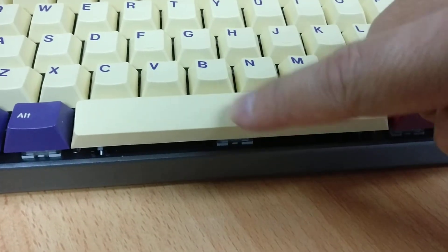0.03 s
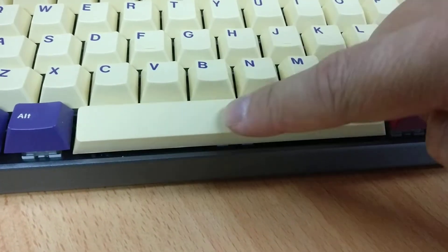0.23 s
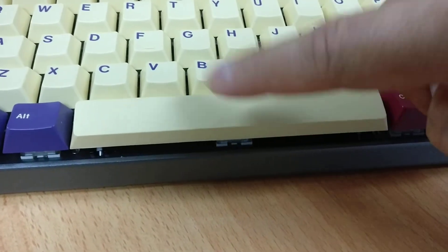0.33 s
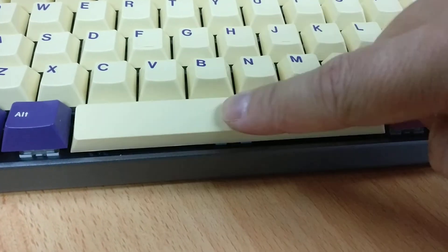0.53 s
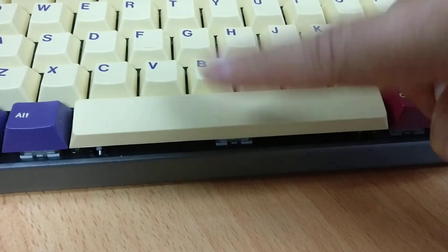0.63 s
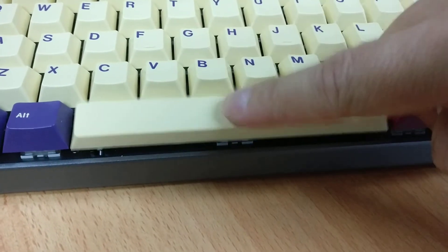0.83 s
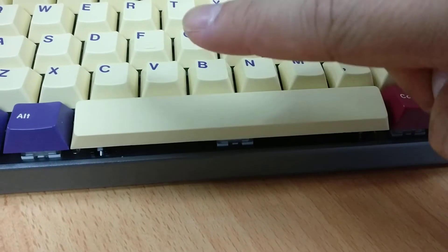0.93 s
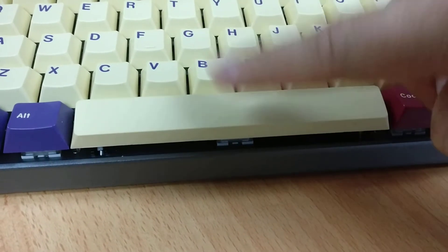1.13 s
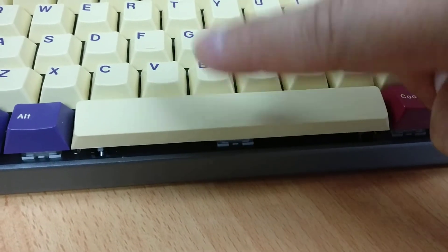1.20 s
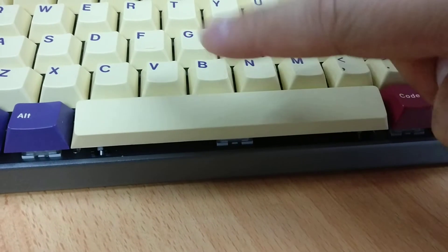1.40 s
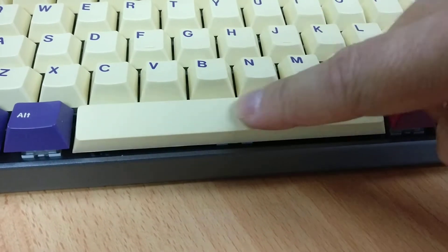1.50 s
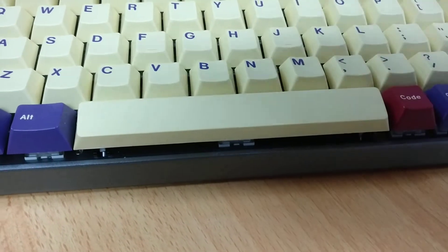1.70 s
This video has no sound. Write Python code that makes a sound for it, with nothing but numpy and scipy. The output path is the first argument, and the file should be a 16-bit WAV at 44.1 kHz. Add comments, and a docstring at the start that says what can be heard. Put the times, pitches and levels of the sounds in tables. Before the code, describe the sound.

Six quick spacebar presses on a mechanical keyboard, each clicking down and clacking back up.

```python
"""At a wooden desk in a small room, a finger presses and releases a loose plastic spacebar six times.
Each stroke starts with ticks of the slack wire that steadies the bar. Then the switch snaps and the bar
hits its stop: bright on the way down, hollower on the way up. The case thuds on the desk, the squeezed
spring buzzes and the fingertip rubs the plastic. The room echoes briefly over a low rumble and hum."""
import sys
import numpy as np
from scipy import signal
from scipy.fft import rfft, irfft
from scipy.io import wavfile

SR = 44100
rng = np.random.default_rng(int(sys.argv[2]) if len(sys.argv) > 2 else 0)


def inscribe(sig):
    """Save sig as 16-bit PCM at rate SR to the path in sys.argv[1].

    A 1-D sig is mono; a 2-D sig holds one channel per row.
    Samples are clipped to [-1, 1] before scaling.
    """
    pcm = np.round(np.clip(np.atleast_2d(sig).T, -1, 1) * 32767)
    wavfile.write(sys.argv[1], SR, pcm.astype(np.int16))


N = 77175
T = np.arange(N) / SR
HIT_T = T[:SR // 8]  # the time span of one hit, in seconds

# Levels are relative. fade_s is the time to fall by 60 dB; pan_db is how much louder the left side is.
# the tone of the switch's noisy snap: pitch_hz, level_db
SNAP_COLOUR = [(6000, -26.5), (8800, -19), (10000, -8), (13000, -8.5), (14500, -12), (15600, 1),
               (16500, -36)]
SNAP_DB, SNAP_FADE_S, SNAP_PAN_DB = -10.5, 0.016, 14


def from_db(db):
    """Turn decibels into a number to multiply by."""
    return 10 ** (np.asarray(db) / 20)


def at_hz(points, n):
    """Read a table at every frequency of a sound n samples long."""
    hz, value = np.transpose(points)
    return np.interp(np.log(np.arange(n // 2 + 1) * SR / n + 1), np.log(hz), value)


def pan(db):
    """Left and right gains; the left keeps its level."""
    return np.array([[1], [from_db(-db)]])


def add(out, start_s, sound):
    """Mix a sound in at its start time."""
    i = int(start_s * SR)
    out[:, i:i + sound.shape[1]] += sound[:, :N - i]


def noise(colour, n, likeness=0):
    """Stereo noise of strength 1, shaped by a tone table; likeness 1 makes both sides the same."""
    mid, side = np.exp(2j * np.pi * rng.random((2, n // 2 + 1)))
    both = np.sqrt(1 + likeness) * mid + np.sqrt(1 - likeness) * side * [[1], [-1]]
    x = irfft(both * from_db(at_hz(colour, n)), n)
    return x / x.std()


def flutter(n, depth_db, rate_hz):
    """A level that wavers quickly at random, making a sound rough."""
    return from_db(depth_db * np.interp(T[:n] * rate_hz, np.arange(n), rng.standard_normal(n)))


def ring(tones, damping=1):
    """A struck part rings with its own tones, a little different each time; damping shortens them."""
    out = 0
    for k, (pitch_hz, fade_s, level_db, pan_db) in enumerate(tones):
        stray_db, detune = rng.standard_normal(2)
        wave = np.sin(2 * np.pi * pitch_hz * (1 + 0.003 * detune) * HIT_T)
        fade = from_db(level_db + stray_db - 60 * damping * HIT_T / fade_s)
        out = out + (-1) ** k * pan(pan_db) * wave * fade  # every other tone starts flipped
    return out


def burst(colour, level_db, fade_s, pan_db, rise_s=0.00045):
    """Many close tones blur into noise and die away together."""
    shape = (1 - np.exp(-HIT_T / rise_s)) * from_db(level_db - 60 * HIT_T / fade_s)
    return pan(pan_db) * shape * noise(colour, len(HIT_T))


def background():
    """Low room rumble with a little hiss and an electric hum."""
    # the tone of the rumble and hiss: pitch_hz, level_db
    air_colour = [(22, -40), (30, -16), (38, 7), (48, -3.5), (80, 1), (130, -0.5), (220, -6), (310, -14),
                  (430, -22), (700, -16.5), (1070, -24), (2100, -22), (3700, -28), (7700, -40.5),
                  (13200, -36.5), (16000, -41.5)]
    # how alike left and right are: pitch_hz, likeness (0 to 1)
    likeness = [(60, 0.97), (150, .97), (350, 0.9), (700, 0.42), (2000, 0.067), (10000, .05)]
    # the tones of the hum: pitch_hz, level_db
    hum_tones = [(61, -52), (114, -54.5)]
    air = from_db(-44.5) * noise(air_colour, N, at_hz(likeness, N))
    hum = sum(from_db(db) * np.sin(2 * np.pi * (hz * T + rng.random())) for hz, db in hum_tones)
    return air + np.sqrt(2) * hum


def room(sound, build_s=0.012, room_fade_s=0.22, desk_fade_s=0.078):
    """Sound bounces quickly off the desk and case, then dies away in the small room."""
    # the tone of the echo: pitch_hz, level_db
    echo_colour = [(150, -25), (700, -12), (1700, -20.5), (2800, -14), (4200, -14), (7000, -17),
                   (10500, -27), (15000, -30.5)]
    fade = from_db(-60 * T / room_fade_s) + from_db(-9 - 60 * T / desk_fade_s)
    shape = (1 - np.exp(-T / build_s)) * fade
    bounces = irfft(rfft(rng.standard_normal((2, N))) * from_db(at_hz(echo_colour, N)), N)
    echo = bounces * shape / np.sqrt(np.sum(shape ** 2))
    return pan(1.5) * signal.fftconvolve(sound[:1], echo, axes=1)[:, :N]


def finger():
    """Skin sticks and slips on the plastic in soft swells."""
    # each slide of the fingertip: middle_s, half_length_s, level_db
    rubs = [(0.166, 0.11, -60), (0.467, 0.017, -55.5), (0.733, 0.059, -59.5), (0.957, 0.047, -48.5),
            (1.194, 0.0075, -49)]
    # the tone of the rubbing: pitch_hz, level_db
    rub_colour = [(600, -6), (1700, 3), (3500, 2), (5600, 0.5), (6500, -6), (8000, -16), (10500, -4.5),
                  (15500, -9.5), (16300, -28)]
    swell = sum(from_db(db) * np.exp(-0.5 * ((T - middle) / half) ** 2) for middle, half, db in rubs)
    return pan(0.5) * swell * flutter(N, depth_db=2, rate_hz=309) * noise(rub_colour, N)


def spring(snap_db):
    """The squeezed spring buzzes after a press, louder after a harder snap."""
    # the tone of the buzz: pitch_hz, level_db
    buzz_colour = [(1500, -15), (2800, 0.5), (4500, 2.5), (6000, -11.5), (9000, -14.5), (10200, 0),
                   (12800, 0), (15500, 1), (16300, -27)]
    buzz = burst(buzz_colour, snap_db - 37, fade_s=0.26, pan_db=3)
    return buzz * flutter(len(HIT_T), depth_db=3.5, rate_hz=403)


def switch(damping):
    """The switch snaps: very high tones and a sharp burst of noise."""
    # the switch rings: pitch_hz, fade_s, level_db, pan_db
    tones = [(8240, .022, -29, 31), (10090, 0.018, -16.5, 44), (11200, 0.027, -20.5, 31),
             (11630, 0.02, -16, 27), (12650, 0.019, -14.5, 28), (13870, 0.01, -22.5, -5.5),
             (14080, 0.011, -7.5, 18), (14660, 0.017, -10.5, 30), (14700, 0.008, -18, 20)]
    return ring(tones, damping) + burst(SNAP_COLOUR, SNAP_DB, SNAP_FADE_S / damping, SNAP_PAN_DB)


def wire(going_up, damping):
    """The slack wire that steadies the bar rings and clatters when jolted."""
    # the wire rings at the bottom or top stop: pitch_hz, fade_s, down_db, up_db, pan_db
    wire_tones = [(3160, 0.015, -41, -24, 22), (3840, 0.037, -46, -33, 36), (4307, 0.013, -32.5, -34.5, -8),
                  (4740, 0.051, -40.5, -62, -5), (5204, 0.02, -44, -36, -5),
                  (5894, 0.016, -42.5, -38.5, -11.5), (6080, 0.017, -55, -37.5, -9.5)]
    # the tone of the clatter: pitch_hz, level_db
    clatter_colour = [(1800, -13), (3000, -2), (4500, 2), (5600, -2.5), (7000, -3.5), (8500, -7.5),
                      (11000, -22)]
    tones = [(hz, fade, up if going_up else down, side) for hz, fade, down, up, side in wire_tones]
    return ring(tones, damping) + burst(clatter_colour, -24, fade_s=0.022 / damping, pan_db=2)


def bar(going_up, damping):
    """The plastic bar knocks against a stop, louder and hollower at the top one."""
    # the bar rings at the bottom or top stop: pitch_hz, fade_s, down_db, up_db, pan_db
    bar_tones = [(855, 0.051, -52.5, -37.5, -2), (1087, 0.038, -49, -37, 2.5),
                 (1370, 0.039, -53, -25.5, 11), (1577, 0.019, -76, -19.5, 7), (1750, 0.037, -36, -19, 36),
                 (2104, 0.019, -36.5, -27, 33), (2448, 0.017, -26.5, -29.5, 5),
                 (2790, 0.027, -31.5, -45, 32)]
    # the tone of the knock: pitch_hz, level_db
    knock_colour = [(60, -24), (200, 0.5), (500, -16.5), (900, -10.5), (1700, 0.5), (2500, 2.5),
                    (3800, -25.5), (6000, -73)]
    tones = [(hz, fade, up if going_up else down, side) for hz, fade, down, up, side in bar_tones]
    knock_db = -23 if going_up else -29
    return ring(tones, damping) + burst(knock_colour, knock_db, fade_s=0.044 / damping, pan_db=6)


def ping(hz, db, fade_s=0.03, pan_db=4, ratio=1.33):
    """Where the loose bar lands, one tone and its close neighbours stand out."""
    nearby = [(hz / ratio ** 2, -60), (hz / ratio, -20), (hz, 0),
              (hz * ratio, -20), (hz * ratio ** 2, -60)]
    return ring([(hz, fade_s, db, pan_db)]) + burst(nearby, db - 3.5, fade_s, pan_db)


def thud():
    """The keyboard's case thuds on the desk."""
    # the low tones of the thud: pitch_hz, fade_s, level_db, pan_db
    tones = [(125.7, 0.055, -36, -1), (192.6, 0.067, -35.5, -0.5), (307, 0.031, -40, -1)]
    return ring(tones)


def contact(snap_db, wire_db, bar_db, going_up, damping=1):
    """One hit makes two sounds: the snap of the switch and the clack of the bar with its wire."""
    snap = from_db(snap_db) * switch(damping)
    clack = from_db(wire_db) * wire(going_up, damping) + from_db(bar_db) * bar(going_up, damping)
    return snap, clack


def tick(db, scrape_s=0.00056):
    """The loose parts touch lightly, scraping in with a softer start."""
    snap, clack = contact(db, wire_db=db + 4, bar_db=db + 4, going_up=False)
    return (snap + clack) * (1 - np.exp(-HIT_T / scrape_s))


def strokes(rows, travel_s, going_up, damping=1):
    """The switch snaps; a moment later the bar hits its stop, a loose part pings and the case thuds."""
    out = np.zeros((2, N))
    for start_s, snap_db, wire_db, bar_db, ping_hz, ping_db in rows:
        snap, clack = contact(snap_db, wire_db, bar_db, going_up, damping)
        stop_s = start_s + travel_s
        add(out, start_s, snap)
        add(out, stop_s, clack + ping(ping_hz, ping_db) + thud())
        if not going_up:  # the switch's stem strikes its floor: a second, softer snap
            add(out, stop_s, burst(SNAP_COLOUR, SNAP_DB + snap_db - 5.5, SNAP_FADE_S, SNAP_PAN_DB))
    return out


def spacebar():
    """Six presses and releases, the light ticks around them and the buzz of the spring."""
    # the bar goes down: start_s, snap_db, wire_db, bar_db, ping_hz, ping_db
    presses = [(0.2207, -2, -1, -3, 4600, -51), (0.5314, 1, 1.5, -2, 3940, -44),
               (0.8056, 1, -5.5, -3.5, 2360, -32.5), (1.0399, 2.5, 0, -2, 4650, -28),
               (1.2735, 0.5, 0.5, -2, 4570, -30), (1.4951, 1.5, 2.5, 2.5, 3910, -37)]
    # the bar springs back: start_s, snap_db, wire_db, bar_db, ping_hz, ping_db
    releases = [(.3120, -11, 0, -2, 2428, -23), (.6184, 1, 3, -1, 3250, -34),
                (.8654, 0, 4, -3.5, 3970, -35), (1.1248, 0, 3.5, -1, 5220, -27.5),
                (1.3576, 0.5, 3.5, 1, 4250, -34.5), (1.5772, 1.5, 0, 2, 2264, -19)]
    # the loose bar and its wire tick: start_s, level_db
    ticks = [(0.208, -16.5), (.2110, -14), (.2910, -18.5), (0.298, -19), (.3100, -11), (0.523, -14.5),
             (0.526, -12.5), (0.5978, -18), (0.607, -18), (0.611, -19), (0.6162, -20), (.7910, -30),
             (0.7944, -15), (.7963, -15), (.8440, -20), (.8540, -23), (0.8644, -12), (0.8748, -14.5),
             (1.0303, -15.5), (1.0338, -9), (1.104, -18.5), (1.1148, -20.5), (1.125, -13.5), (1.2628, -22),
             (1.267, -11), (1.2703, -13.5), (1.3388, -14), (1.35, -24), (1.3512, -13), (1.3565, -9),
             (1.4874, -17), (1.4896, -6.5), (1.517, -32), (1.5592, -11.5), (1.5698, -24), (1.5749, -11.5)]
    out = strokes(presses, travel_s=0.0023, going_up=False)
    out += strokes(releases, travel_s=0.0002, going_up=True, damping=1.196)
    for start_s, level_db in ticks:
        add(out, start_s, tick(level_db))
    for start_s, snap_db, *_ in presses:
        add(out, start_s, spring(snap_db))
    return out


def scene():
    """The spacebar and the finger in their room."""
    clicks = spacebar()
    return clicks + room(clicks) + finger() + background()


def record(dry, low_cut_hz=34.4, high_cut_hz=16500):
    """The microphone loses the deepest bass, rounds off the peaks and cuts the highest treble."""
    bass_cut = signal.butter(4, low_cut_hz, "high", fs=SR, output="sos")
    treble_cut = signal.ellip(10, 0.1, 80, high_cut_hz, fs=SR, output="sos")
    rounded = np.tanh(signal.sosfilt(bass_cut, dry))
    return signal.sosfilt(treble_cut, rounded)


dry = scene()
out = record(dry)
inscribe(out)
```